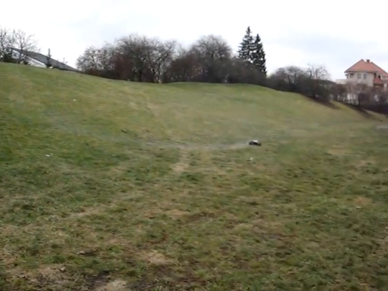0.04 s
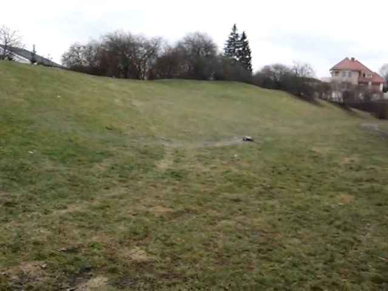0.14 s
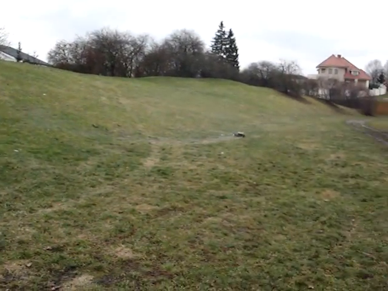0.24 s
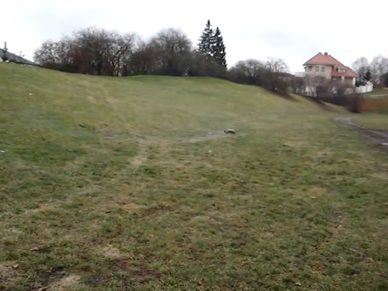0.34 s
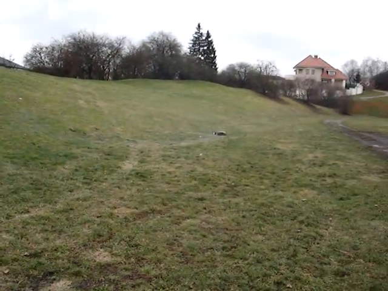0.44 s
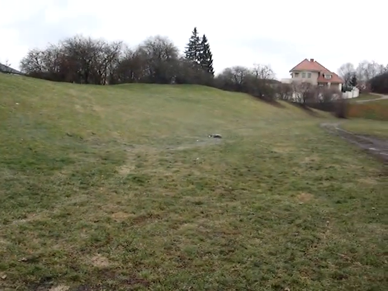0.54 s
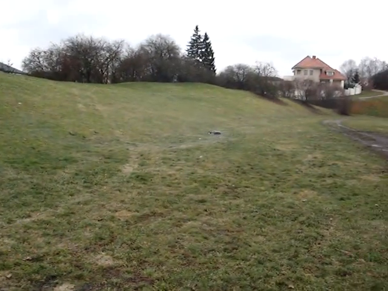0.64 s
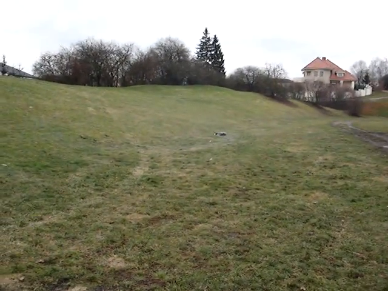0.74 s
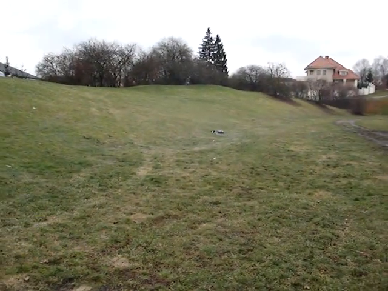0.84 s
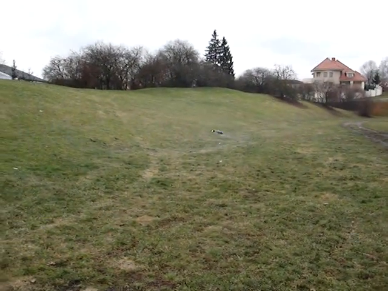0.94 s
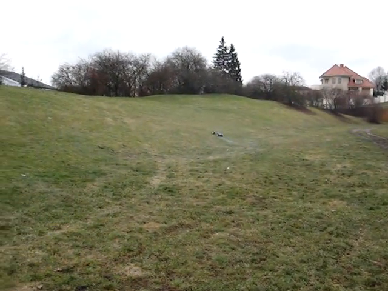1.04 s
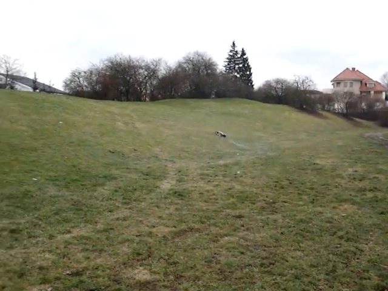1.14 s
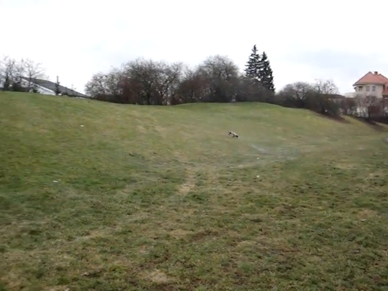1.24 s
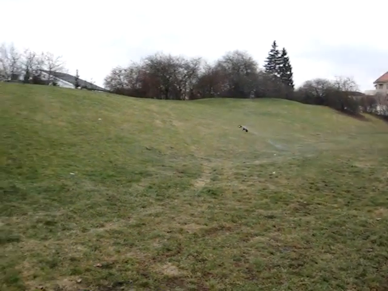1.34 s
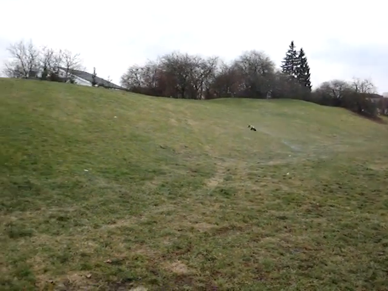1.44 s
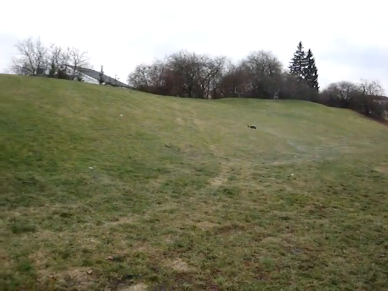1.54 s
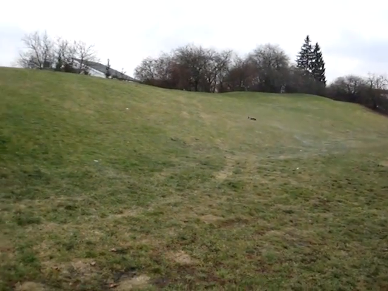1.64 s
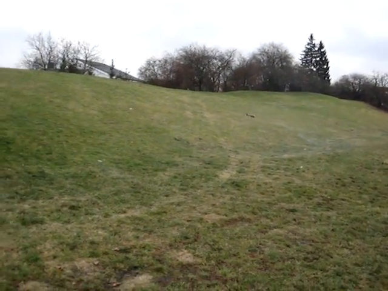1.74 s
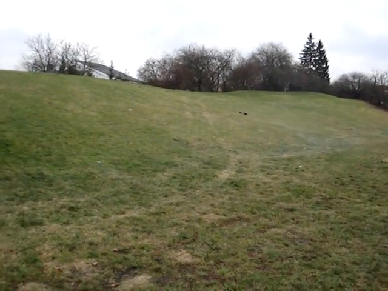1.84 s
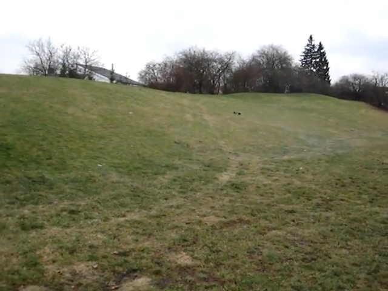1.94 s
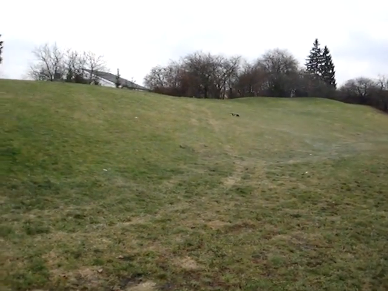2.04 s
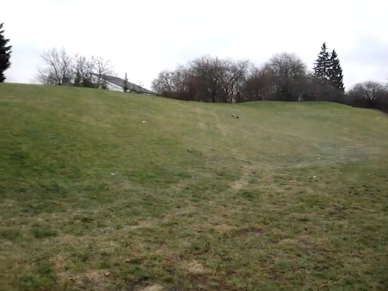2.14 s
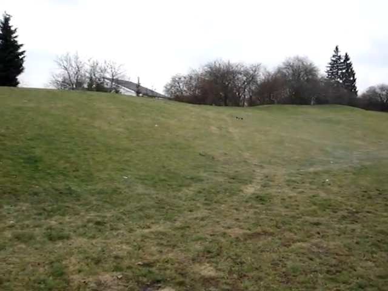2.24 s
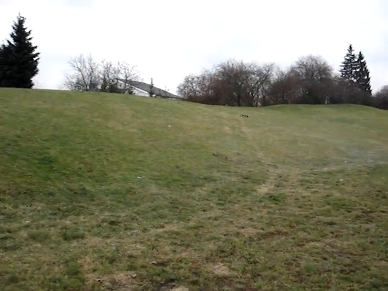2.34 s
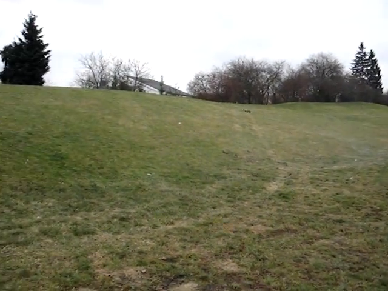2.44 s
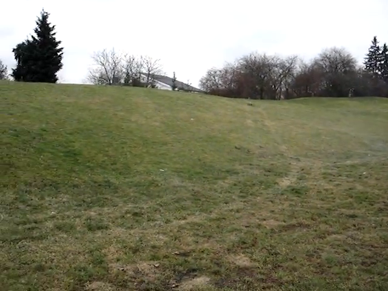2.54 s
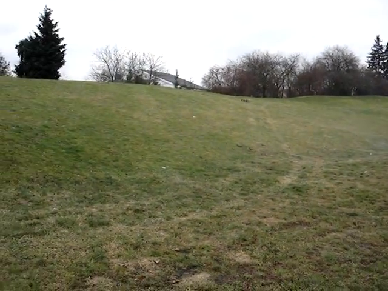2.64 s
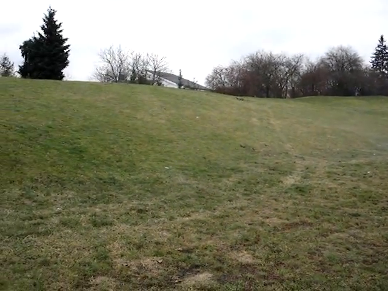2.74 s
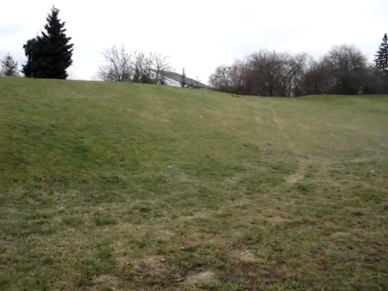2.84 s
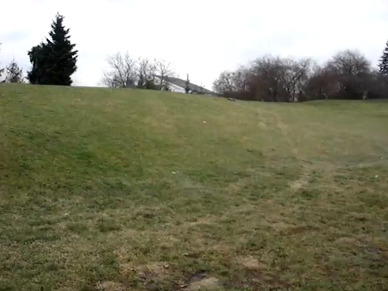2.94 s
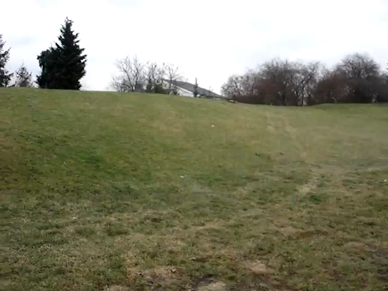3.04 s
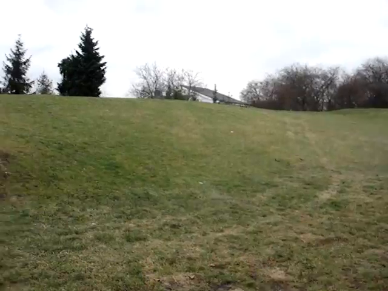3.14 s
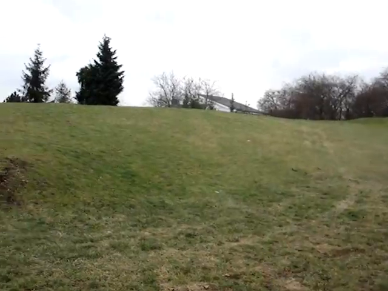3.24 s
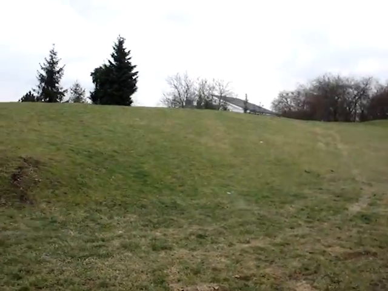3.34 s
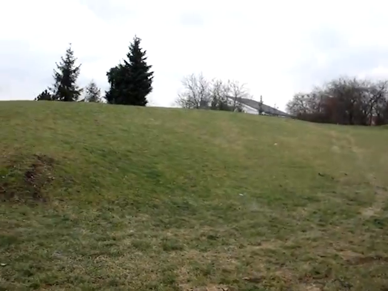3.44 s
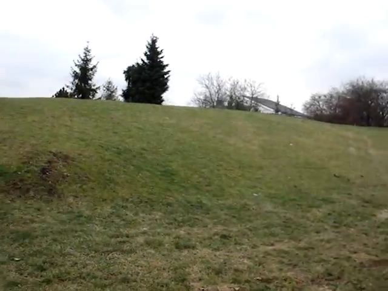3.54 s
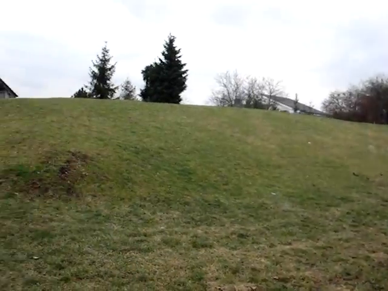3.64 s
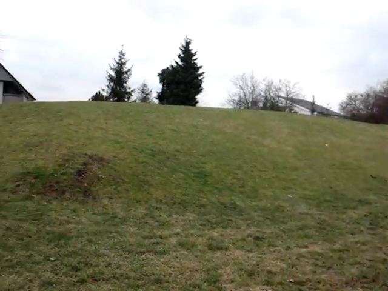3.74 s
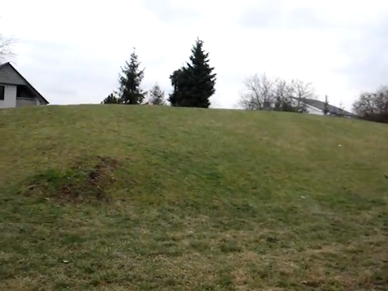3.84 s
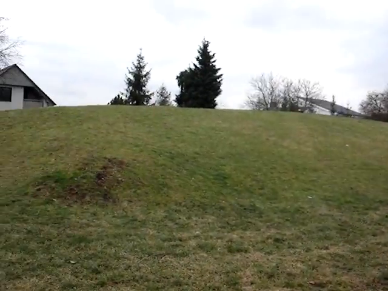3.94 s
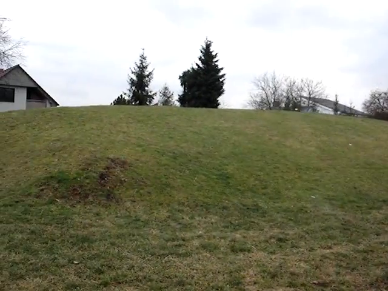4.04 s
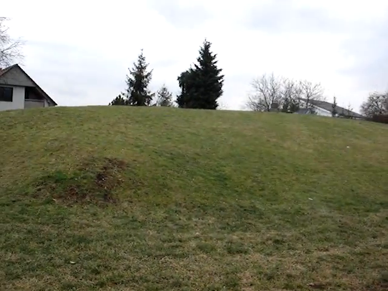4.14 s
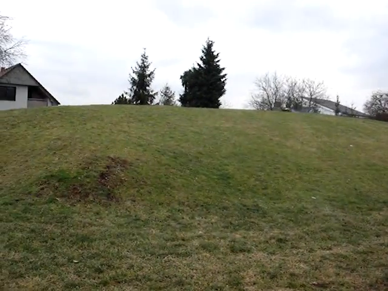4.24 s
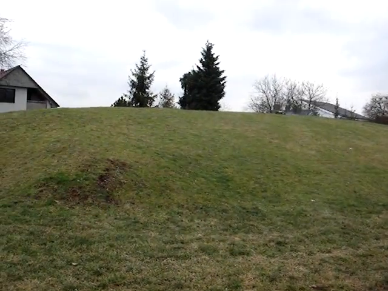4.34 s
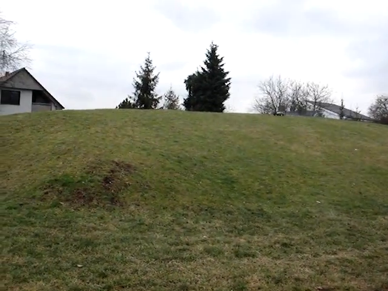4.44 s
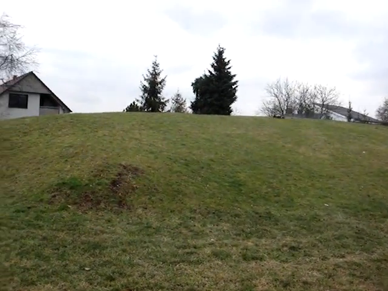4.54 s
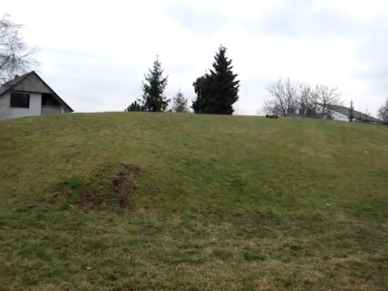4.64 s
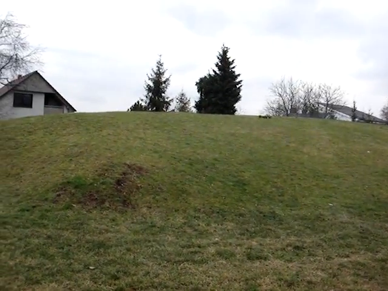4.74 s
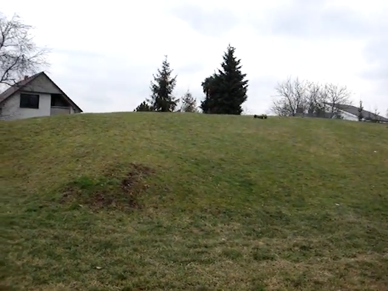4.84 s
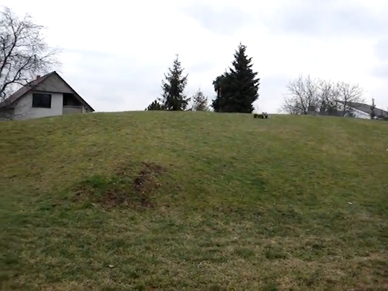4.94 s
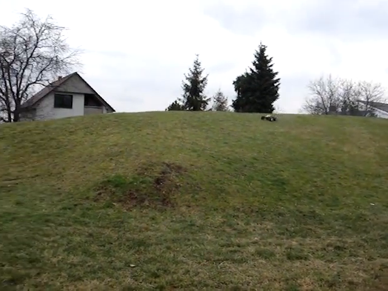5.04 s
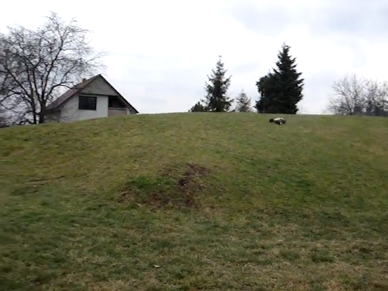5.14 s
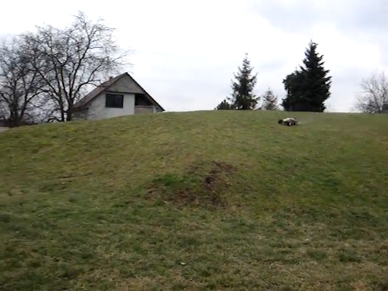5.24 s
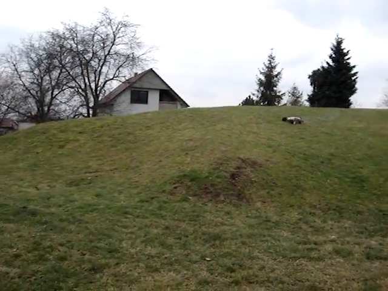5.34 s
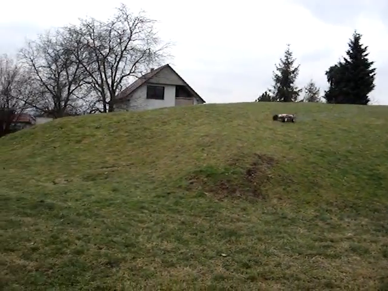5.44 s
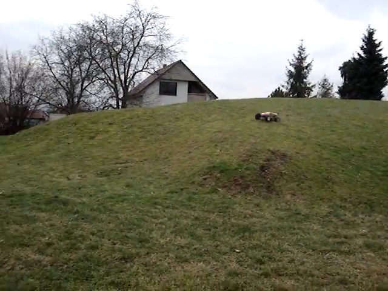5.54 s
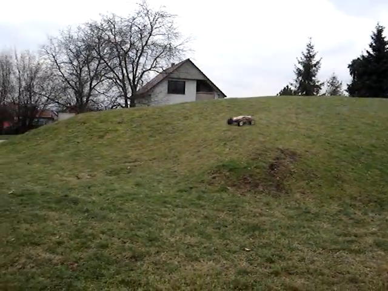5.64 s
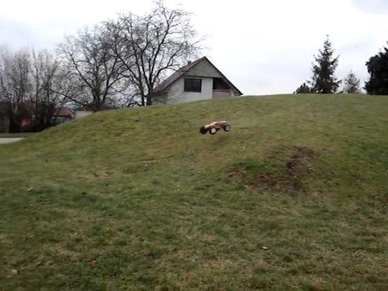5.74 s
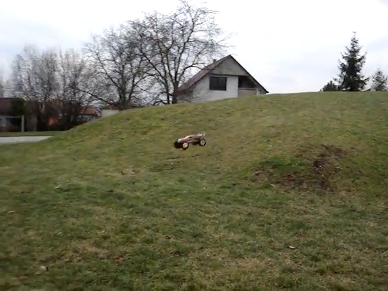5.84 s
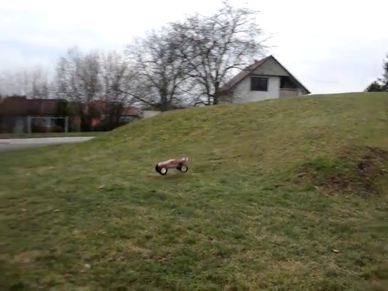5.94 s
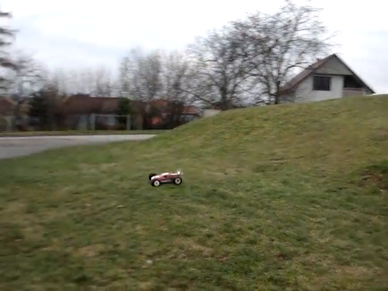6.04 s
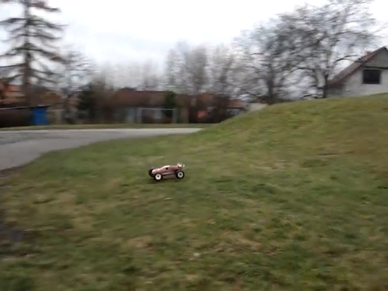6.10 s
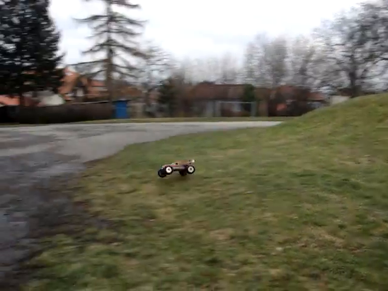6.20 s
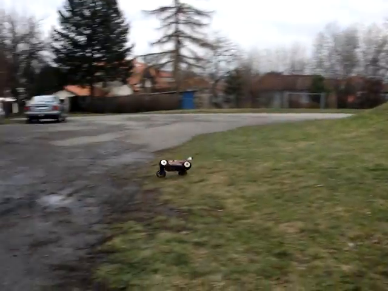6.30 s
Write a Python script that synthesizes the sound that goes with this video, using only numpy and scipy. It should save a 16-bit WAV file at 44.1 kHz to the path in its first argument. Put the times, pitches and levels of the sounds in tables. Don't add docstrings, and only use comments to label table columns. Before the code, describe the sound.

A tiny nitro engine sings with a raspy, buzzing whine outdoors, its revs repeatedly rising and dropping as tyres bite or slip. Gas hiss, chassis rattle and turf scrapes roughen it. After mid-way it returns at higher pitch, wind puffs bump the microphone, and it jumps and lands close with small dull knocks and a bright tick. One uneven pocket-camera microphone, faint town rumble behind.

```python
import sys
import numpy as np
from scipy import signal
from scipy.fft import rfft, irfft
from scipy.io import wavfile
from scipy.ndimage import uniform_filter1d

SR = 44100
rng = np.random.default_rng(int(sys.argv[2]) if len(sys.argv) > 2 else 0)


def voltage_ratio(decibels):
    exponent = np.asarray(decibels, float) / 20
    return 10 ** exponent


def persist_wave(psi):
    counts = np.round(np.clip(psi, -1, 1) * 32767).astype(np.int16)
    wavfile.write(sys.argv[1], SR, np.atleast_2d(counts).T)


N = 280917
STEP = 32
OVERRUN_HZ_PER_S = 3100

# (time [s], firing rate [Hz])
FREE_SPEED = [(0, 416.6), (.2, 429), (.3, 300.6), (.44, 256), (.54, 258), (.66, 360), (1.08, 359.6),
              (1.3, 440), (1.58, 452.7), (1.69, 235), (2.2, 402.3), (2.6, 311), (3.15, 315.8),
              (3.57, 350.3), (4.09, 484), (4.4, 521.6), (5.79, 548.6), (6.37, 657.3)]
# (deepest time [s], loss [firings/s], fall [s], recovery [s])
BOGS = [(.718, 19, 0.055, 0.052), (.938, 24, 0.045, 0.1), (1.16, 78, 0.1, .14), (1.377, 17, 0.043, 0.017),
        (1.616, 52, 0.037, 0.047), (1.815, 14.12, 0.02015, 0.0502), (2.095, 66.5, 0.064, 0.11),
        (2.395, 115, 0.079, 0.085), (2.474, 96, .08, 0.067), (2.735, 84.4, 0.1, 0.099),
        (3.712, 28, .07, 0.14), (3.931, 51.4, 0.062, 0.13), (4.171, 43.5, 0.068, 0.13),
        (4.283, 109, 0.044, .11), (4.5, 66.7, 0.073, 0.1), (4.669, 91, 0.051, 0.18), (4.76, 18, .05, .1),
        (4.85, 42, .1, 0.039), (4.905, 180, 0.054, 0.16), (5.208, 98, 0.068, 0.18), (5.448, 88, .09, 0.17),
        (6.098, 80, .02, 0.063), (6.175, 84, 0.013, .065), (6.255, 79, 0.017, 0.062),
        (6.33, 88, 0.013, 0.059)]
# (time [s], loss [firings/s], fall [s], recovery [s])
LANDING = [
    (6.098, 205, .035, 1.2),
]
# (peak time [s], gain [firings/s], rise [s], fall [s])
WHEELSPINS = [(.2, 6.3, 0.09, 0.023), (1.796, 11.2, 0.034, 0.012), (2.3, 12, 0.049, 0.031),
              (.858, 40.6, .1, .05), (1.48, 22, .1, 0.05398), (3.273, 74, .12, .08),
              (3.632, 15, 0.0607, 0.04017), (4.61, 15.57, 0.03131, 0.0202), (5.927, 35, .14, .05),
              (6.025, 20.1, 0.0468, 0.02858)]
# (loudest time [s], level [dB], rise [s], fall [s])
SCRAPES = [(1.35, 1.5, 0.1, 0.052), (1.8, 3.5, .06, 0.38), (2.29, 4.5, .06, .06), (3.86, 2.5, .04, .04),
           (4.68, 8, 0.031, .06), (4.9, 6.5, 0.042, 0.11), (5.8, 5, 0.036, 0.051), (6.09, 10, 0.018, .05),
           (6.27, 3.5, .08, 0.057)]
# (time [s], level [dB])
NEARNESS = [(0, 1.5), (.2, 3.5), (.35, 9), (.57, 3.5), (.94, 2), (1.22, 3.5), (1.51, 1), (1.9, -1.5),
            (2.2, 1.5), (2.55, -1.5), (2.93, -2.5), (3.21, -2.5), (3.55, -7), (3.9, -3.5), (4.05, 0),
            (4.45, 4.5), (5.9, 4), (6.37, 4.5)]
# (time [s], level [dB])
EXHAUST_AIM = [(0, -15), (.6, -5), (1.1, -3.5), (1.5, -15.5), (1.9, -4), (2.2, 4), (2.6, 2.5), (3.1, 6.5),
               (3.3, 6), (3.7, 8.5), (4.2, 7.5), (4.6, 8), (4.8, -1.5), (5.2, 1.8), (5.6, 2.5), (5.87, 9.5),
               (6.0, -3.5), (6.37, -7)]
# (time [s], level [dB])
ENGINE_LOAD = [(0, 4), (.2, 3.5), (.3, -8.5), (.55, 0), (1.0, -1.5), (1.2, 0), (1.32, 10), (1.55, 5),
               (1.8, 1.5), (2.3, -1), (2.5, 3), (3.2, -2), (3.9, 1.5), (4.2, 1.5), (4.6, -2.5), (5.05, 3.5),
               (6.05, 0), (6.37, 5.5)]
# (deepest time [s], loss [dB], fall [s], recovery [s])
THROTTLE_LIFTS = [(.3, 10, 0.097, 0.28), (1.72, 8, 0.18, 0.13), (2.4, 8, 0.15, 0.14), (2.71, 7.5, .07, .12),
                  (3.05, 1.5, .1, 0.11), (4.28, 3, 0.02, 0.032), (4.88, 5.5, 0.018, 0.017),
                  (6.1, 7.5, 0.016, 0.059), (6.18, 5, 0.02, .03)]
# (level [dB], shares of nearness, aim, load, lift, scrape and
# camera gain [dB/dB], change [dB per 100 firings/s lost])
VOICES = dict(first=(-34, 0.73, 0.7354, 0.12, 1, -.3, 0.15, -2),
          second=(-34.5, 0.5, 1.29, 0.43, 2, 0, 0.06, -1.5),
          middle=(-38.5, 0.66, 0.33, 1.31, 0.3, 0.3, 0.09, 0.3),
          upper=(-36.5, 1.01, 0.15, 0.69, 5.6, 0, -0.34, 0.6),
          top=(-37.5, 1.2, 0.09, 0.78, 1.4, -0.3, -0.18, 1.4),
          roar=(-38, 0.23, 0.35, -0.09, 0.53, 1.37, 0.3671, 0.04),
          rattle=(-40, 1.55, 0.16, 0.74, 0.8, .8, -0.06, -0.5),
          hiss=(-26, 1.2369, -0.17, -0.33, 1.68, -0.01, 0.03, 0.57),
          sheen=(-3, 0.01, 0.02, -0.02, -0.1, -0.1, -0.27, -0.9))
OVERRUN_DB = dict(first=-1.5, second=-5.5, middle=-10.5, upper=-4.5, top=-3, roar=6, rattle=3.5, hiss=-3.5, sheen=5.5)
# (frequency [Hz], width [Hz], level [dB])
PIPE_BOOM = [(235, 30, -0.5), (480, 52, -2.5), (323, 60, -1), (532, 24, 3), (717, 56, 3.5), (1077, 48, -10)]
# (frequency [Hz], width [Hz], level [dB])
PIPE_SHELL = [(824, 230, 9.5), (1310, 510, -3), (2240, 148, 4), (2670, 73, -12), (3303, 47, 7.5),
              (3458, 267, -12), (4575, 104, -19.5), (6300, 170, 5.5), (7100, 630, -12.5)]
# (time [s], half length [s], frequency [Hz], level [dB])
SWELLS = [(0.028, 0.03, 5040, -8), (0.32, 0.099, 3220, 19), (0.457, 0.064, 3640, 13.5),
          (0.839, 0.06, 4940, -21), (1.087, 0.3, 2200, 5), (1.25, 0.071, 4930, 9.5),
          (1.314, 0.19, 5400, 4.5), (1.333, 0.11, 4000, 5.5), (1.336, 0.18, 1300, -17),
          (1.552, 0.11, 4620, 22), (1.89, 0.11, 2070, 12), (3.064, 0.051, 2240, 16), (3.74, 0.14, 1527, 5),
          (1.723, 0.12, 756, -13), (4.458, 0.074, 5536, 14), (4.516, 0.24, 1485, 8.5),
          (5.324, 0.098, 3010, 10.5), (5.369, 0.12, 6230, 7), (5.504, 0.053, 2465, 10),
          (5.648, 0.067, 2204, 5), (5.65, 0.13, 3223, 10), (5.735, 0.3, 6620, 14), (5.86, 0.14, 2320, 13.5),
          (6.033, 0.06, 4610, 24), (0.086, 0.1, 840, 19.5), (1.432, 0.18, 2250, 0), (1.953, .2, 992, 8),
          (3.95, .1, 415, -1), (4.805, 0.096, 480, -10), (4.806, .08, 3350, 5)]
# (frequency [Hz], level [dB])
ROAR_TONE = [(150, -21), (300, -19), (550, -6), (850, 3), (1100, 0.5), (1350, -5.5), (2200, -5.5),
             (3000, -46)]
# (frequency [Hz], level [dB])
RATTLE_TONE = [(1200, -22), (1900, 0.5), (2500, -2), (3000, 0.5), (4200, -7), (5500, -40.5)]
# (frequency [Hz], level [dB])
HISS_TONE = [(2800, -30), (3800, -16), (4600, -2.5), (5600, -1.5), (6600, -3.5), (8500, -5), (9500, -13.5),
             (10300, -18.5)]
# (frequency [Hz], width [Hz], level [dB])
METAL_RINGS = [(5337, 138, 9.5), (7100, 200, -2.5), (7814, 115, 8.5), (9200, 67, 11)]
# (time [s], pitch factor [ratio])
DOPPLER = [(0, .98), (2.4, .975), (3.3, 1.005), (4.5, 1.025), (6.0, 1.025), (6.37, 1.0)]
# (time [s], level [dB])
TOWN_LEVEL = [(0.0, -65.5), (1.84, -59), (2.71, -48.5), (4.28, -52), (4.35, -53.5), (5.14, -66.5),
              (6.37, -70.5)]
# (frequency [Hz], level [dB])
TOWN_TONE = [(20, -23.5), (50, -19), (100, -3), (140, -8.5), (200, 0), (300, -5), (450, 1), (700, -57.5)]
# (time [s], peak level [dB], fall [s])
WIND_PUFFS = [(.62, -50, 0.024), (.98, -48, 0.018), (4.378, -22.5, 0.0056), (4.402, -27, .005),
              (4.425, -28, 0.023), (4.495, -34, 0.027), (4.572, -40, .012), (4.709, -38, 0.018),
              (4.921, -46, 0.021)]
# (time [s], peak level [dB], frequency [Hz], fall [s])
CHASSIS_KNOCKS = [
    (2.4785, -2, 1230, 0.00035),
    (6.085, -32, 1040, 0.0045),
    (6.093, -32, 605, 0.014),
    (6.322, -19.5, 2733, 0.0044),
]
# (frequency [Hz], width [Hz], level [dB])
MICROPHONE = [(1977, 114, -18), (3480, 270, 1)]


def curve(table):
    times, values = np.transpose(table)
    return np.interp(np.arange(N) / SR, times, values)


def tents(rows):
    t = np.arange(N) / SR
    return sum(np.interp(t, [s - abs(rise), s, s + abs(fall)], [0, size, 0]) for s, size, rise, fall in rows)


def unit(x):
    return x / np.sqrt(np.mean(x ** 2))


def walk(rate):
    hold = int(SR / STEP / rate)
    held = np.repeat(rng.standard_normal(N // STEP // hold + 2), hold)
    slow = uniform_filter1d(uniform_filter1d(held, hold), hold)
    return np.interp(np.arange(N), STEP * np.arange(len(slow)), unit(slow))


def bumps(hz, modes):
    return sum(db / (1 + ((hz - f) / width) ** 2) for f, width, db in modes)


def shape(x, tone):
    hz = np.fft.rfftfreq(N, 1 / SR) + 1
    f, db = np.transpose(tone)
    tone_db = np.interp(np.log(hz), np.log(f), db, left=-99, right=-99)
    return irfft(rfft(x) * voltage_ratio(tone_db), N)


def flutter(tone, gate, own_db, rate, count=3, top_db=0):
    spec = rfft(shape(gate * rng.standard_normal(N), tone))
    hz = np.fft.rfftfreq(N, 1 / SR) + 1
    lowest, highest = tone[0][0], tone[-1][0]
    out = 0
    for centre in lowest * 2 ** np.arange(0, np.log2(highest / lowest) + 1 / count, 1 / count):
        share = np.clip(1 - count * np.abs(np.log2(hz / centre)), 0, 1)
        lean = np.clip(np.log2(centre / 6500) / .5, 0, 1)
        out = out + irfft(spec * share, N) * voltage_ratio(own_db * walk(rate) + lean * top_db)
    return unit(out)


def revs():
    rate = curve(FREE_SPEED) - tents(BOGS + LANDING) + tents(WHEELSPINS)
    return uniform_filter1d(rate, size=350)


def crank(smooth_revs):
    wander = (1 + tents(SCRAPES) / 4) * .008 * walk(55)
    hz = smooth_revs * (1 + wander + .006 * walk(24))
    turns = np.cumsum(hz) / SR + .006 * walk(300)
    return hz, turns


def voices(smooth_revs):
    gain = curve(TOWN_LEVEL)
    drive = np.array([np.ones(N), curve(NEARNESS), curve(EXHAUST_AIM), curve(ENGINE_LOAD),
                      -tents(THROTTLE_LIFTS), tents(SCRAPES), gain - gain.mean(),
                      tents(BOGS + LANDING) / 100])
    falling = -np.gradient(uniform_filter1d(smooth_revs, size=900)) * SR
    overrun = np.tanh(np.maximum(falling / OVERRUN_HZ_PER_S, 0))
    return {name: np.array(shares) @ drive + OVERRUN_DB[name] * overrun for name, shares in VOICES.items()}


def pipe(hz, turns, level):
    i = np.arange(0, N, STEP)
    out = 0
    for k in range(1, 18):
        if k <= 2:
            db = level["first"] if k == 1 else level["second"]
            modes, fast_db, slow_db = PIPE_BOOM, 1.8, 2.0
        else:
            db = level["middle"] if k <= 5 else level["upper"] if k <= 8 else level["top"] - 2 * max(k - 13, 0)
            modes, fast_db, slow_db = PIPE_SHELL, 2.1, 1.0
        partial_hz = k * hz[i]
        ring = bumps(partial_hz, modes)
        for s, half, f, swell_db in SWELLS:
            in_time = ((i / SR - s) / half) ** 4
            in_pitch = ((partial_hz - f) / (.06 * f)) ** 2
            ring = ring + swell_db * np.exp(-in_time - in_pitch)
        db = db + np.interp(np.arange(N), i, ring) + fast_db * walk(38) + slow_db * walk(13)
        out = out + voltage_ratio(db) * np.sin(2 * np.pi * (k * turns + rng.random()))
    return out


def gas(turns, level):
    size = voltage_ratio(2.0 * rng.standard_normal(N // 40))[turns.astype(int) + 1]
    gate = 1.3 + size * np.exp(-(turns % 1) / .3)
    roar = voltage_ratio(level["roar"]) * flutter(ROAR_TONE, gate, own_db=3.07, rate=16)
    rattle = voltage_ratio(level["rattle"]) * flutter(RATTLE_TONE, gate, own_db=3.0, rate=16)
    hiss = flutter(HISS_TONE, gate, own_db=2.5, rate=30, count=6, top_db=level["sheen"])
    return roar + rattle + voltage_ratio(level["hiss"] + walk(16)) * hiss


def metal(x):
    hz, s, spec = signal.stft(x, SR, nperseg=512)
    shift = np.interp(s, *np.transpose(DOPPLER))
    ringing = voltage_ratio(bumps(hz[:, None] / shift, METAL_RINGS))
    return signal.istft(spec * ringing, SR, nperseg=512)[1][:N]


def rumble():
    return voltage_ratio(curve(TOWN_LEVEL) + 10.5) * flutter(TOWN_TONE, 1, own_db=3.0, rate=6)


def wind():
    t = np.arange(N) / SR
    steps = sum(voltage_ratio(db) * (t > s) * np.exp(-np.abs(t - s) / fall) for s, db, fall in WIND_PUFFS)
    flow = unit(shape(rng.standard_normal(N), [(8, 4), (30, -29), (70, -20)]))
    breeze = voltage_ratio(-65.5 + 4.3 * walk(3.6)) * flow
    return uniform_filter1d(steps, size=90) + breeze


def knocks():
    t = np.arange(N) / SR
    ticks = 0
    for s, db, hz, fall in CHASSIS_KNOCKS:
        ticks = ticks + voltage_ratio(db) * np.exp(-((t - s) / fall) ** 2) * np.cos(2 * np.pi * hz * (t - s))
    return shape(ticks, [(150, -40), (500, 0), (9000, 0)])


def scene():
    smooth_revs = revs()
    hz, turns = crank(smooth_revs)
    level = voices(smooth_revs)
    car = metal(pipe(hz, turns, level) + gas(turns, level))
    mono = car + knocks() + rumble() + wind()
    return np.array([mono, mono])


def treble_gaps(x):
    hz, _, spec = signal.stft(x, SR, nperseg=256)
    rows, columns = spec.shape
    lost = rng.random((rows // 3 + 1, columns // 3 + 1)) < .09
    lost = np.repeat(np.repeat(lost, 3, axis=0), 3, axis=1)[:rows, :columns]
    lost = lost & (hz[:, None] > 5200)
    return signal.istft(spec * ~lost, SR, nperseg=256)[1][:N]


def top_cut(x):
    return signal.sosfilt(signal.butter(12, 10530, fs=SR, output="sos"), x)


def record(dry):
    hz = np.fft.rfftfreq(N, 1 / SR)
    heard = irfft(rfft(dry[0]) * voltage_ratio(bumps(hz, MICROPHONE)), N)
    soft = .8 * np.tanh(heard / .8)
    top_db = -.28 * np.maximum(hz - 10060, 0)
    mono = treble_gaps(irfft(rfft(soft) * voltage_ratio(top_db), N))
    return top_cut(np.array([mono, mono]))


dry = scene()
out = record(dry)
persist_wave(out)
```